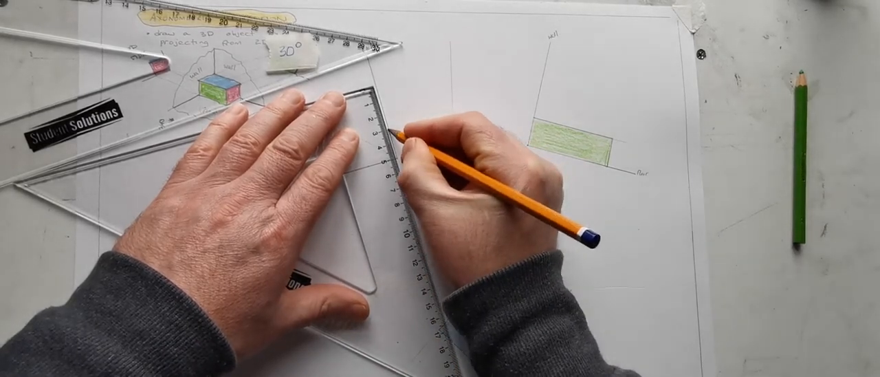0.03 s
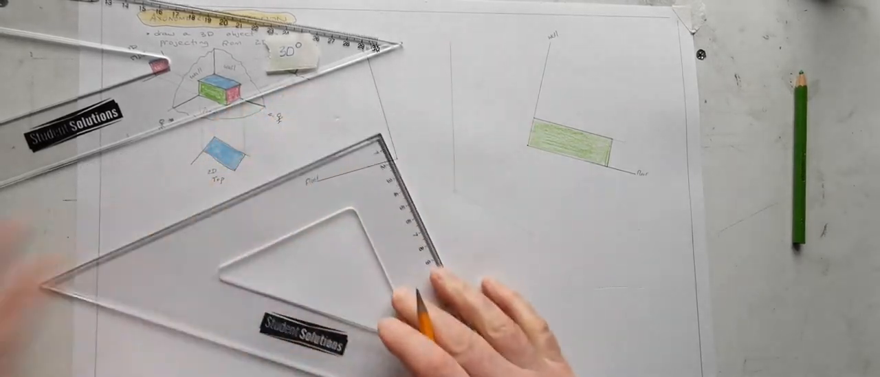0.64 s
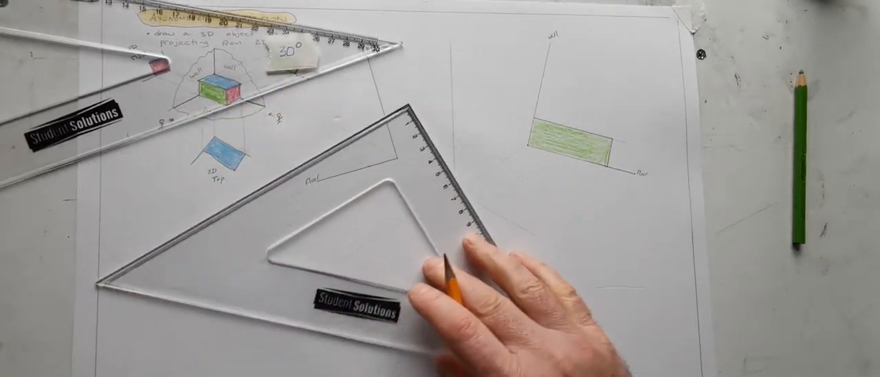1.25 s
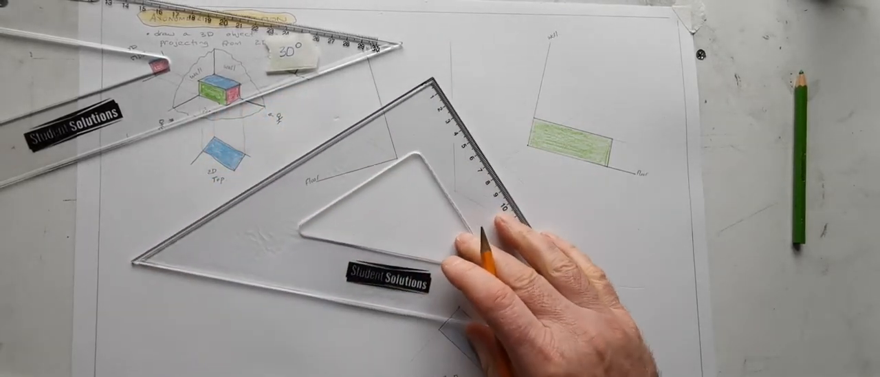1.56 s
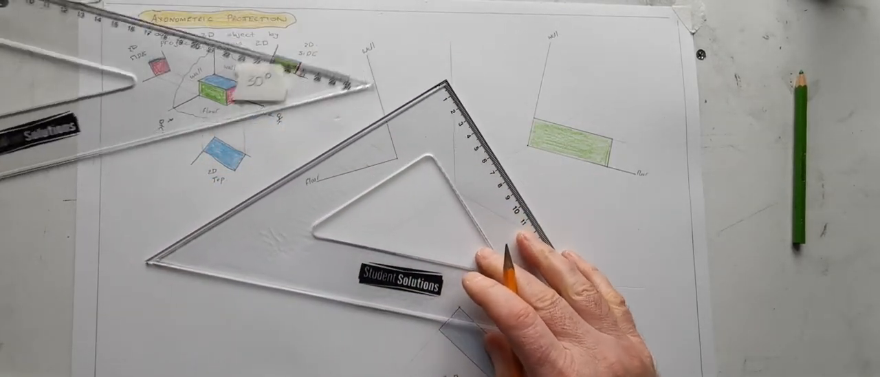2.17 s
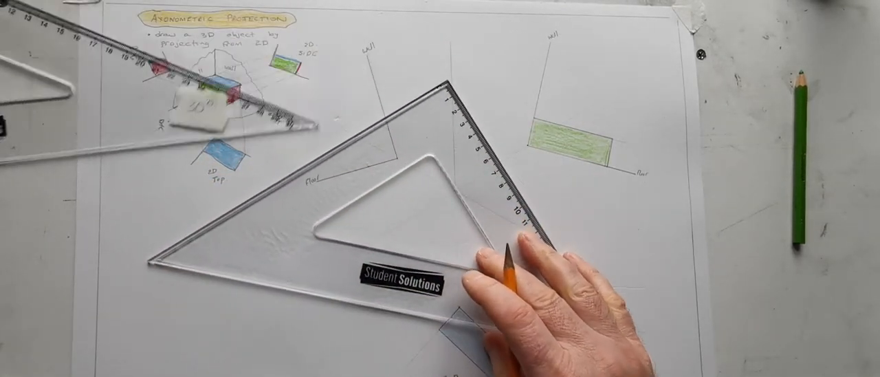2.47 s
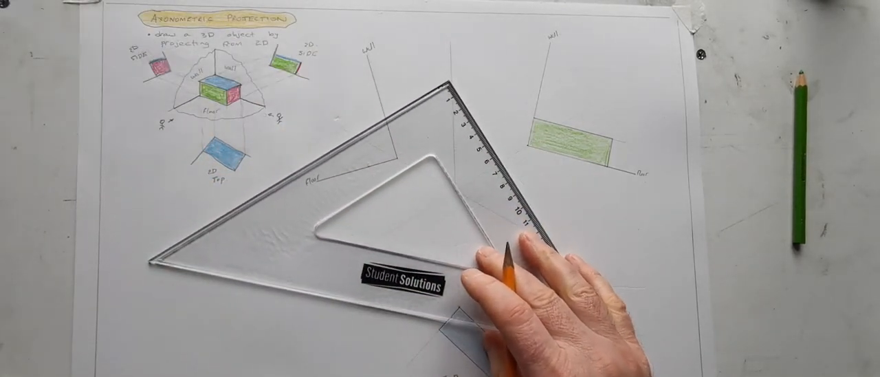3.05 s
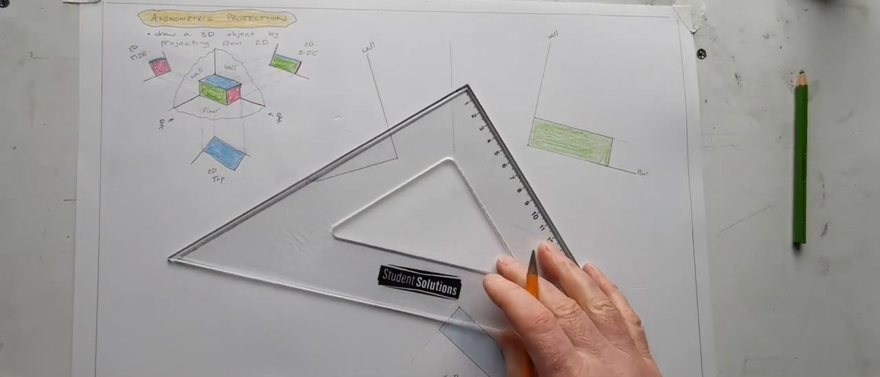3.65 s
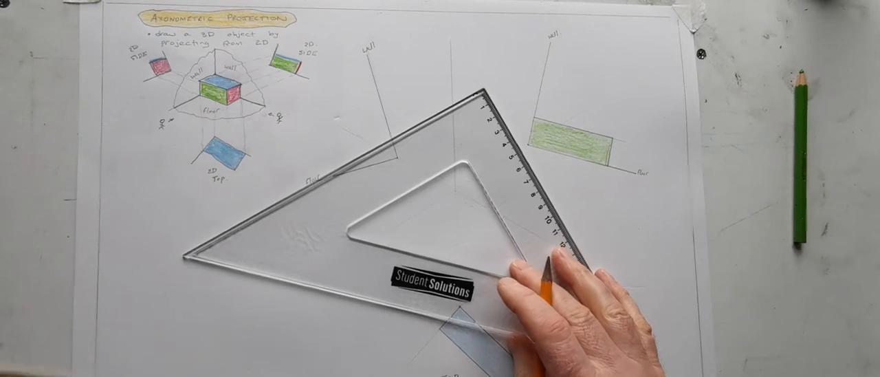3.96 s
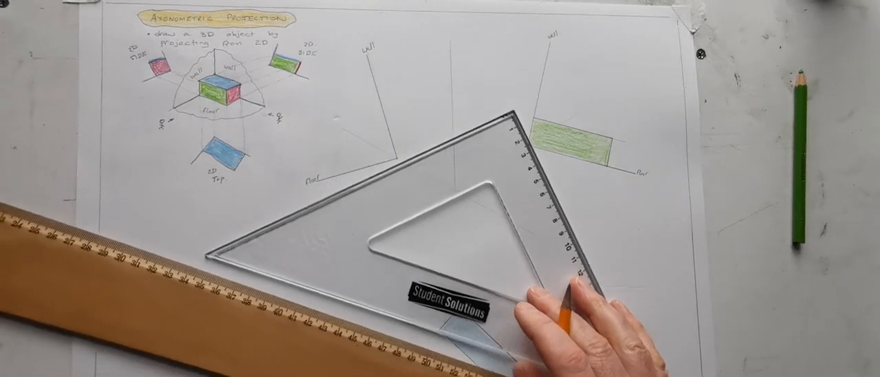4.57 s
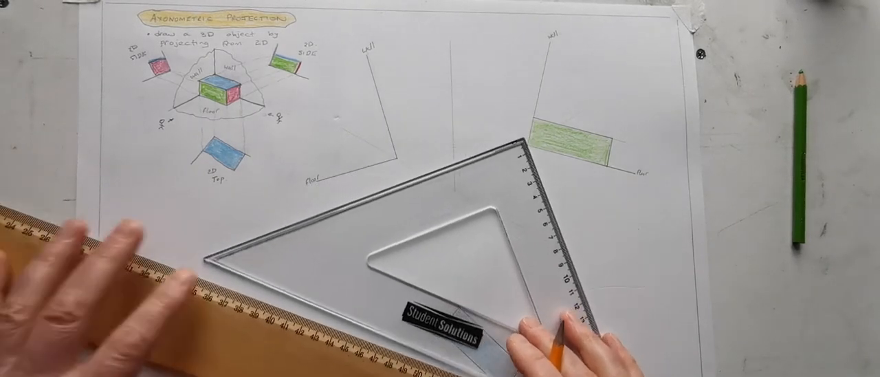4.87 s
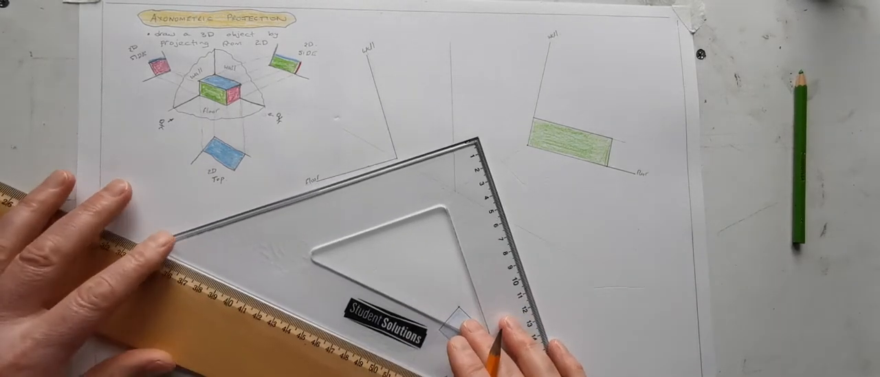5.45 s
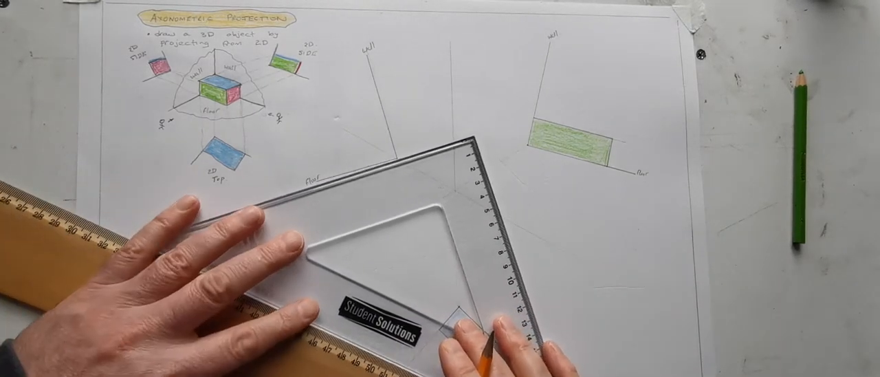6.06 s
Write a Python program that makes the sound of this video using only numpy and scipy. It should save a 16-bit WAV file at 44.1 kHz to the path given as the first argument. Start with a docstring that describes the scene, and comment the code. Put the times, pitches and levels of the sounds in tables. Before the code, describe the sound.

Hands brush paper in a small room as plastic drawing tools glide, tap and scrape, followed by a sliding wooden ruler.

```python
"""A small, bare room, at a paper-covered drawing board; a stereo pair stands far enough off that
reflections outweigh the direct sound. Hands brush the sheet and the board thuds and rumbles under them.
A large plastic set square slides and clacks down; a small one is swept off the paper, tapped down and
shoved aside. A wooden ruler is pushed in and knocks against the large square. Friction and sharp
contacts set each tool ringing at its own resonances."""
import sys
import numpy as np
from scipy import signal
from scipy.fft import rfft, irfft, next_fast_len
from scipy.io import wavfile
from scipy.ndimage import map_coordinates

SR = 44100
rng = np.random.default_rng(int(sys.argv[2]) if len(sys.argv) > 2 else 0)


def wav_record(signal):
    """Record a signal, one row per channel, as 16-bit PCM in the file named by sys.argv[1]."""
    frames = np.transpose(np.atleast_2d(signal))
    bounded = np.clip(frames, -1, 1)
    # unit amplitude maps onto the largest positive 16-bit level
    quanta = np.round(bounded * 32767).astype(np.int16)
    wavfile.write(sys.argv[1], SR, quanta)


N = 278271
TIME = np.arange(N) / SR

# Strokes on the paper. Each row: start, time speeding up and time slowing down in seconds,
# relative level in dB.
HAND_BRUSHES = [(0.16, .12, 0.38, -63.5), (0.33, 0.14, 0.18, -59.5), (0.56, .15, 0.15, -63.5),
                (2.38, 0.074, 0.094, -70), (2.49, 0.08, 0.043, -57.5), (2.8, 0.075, .28, -70),
                (4.64, .12, 0.4, -68.5), (4.89, 0.16, 0.27, -53.5), (5.14, 0.19, 0.3, -62),
                (5.6, 0.052, 0.083, -73.5), (5.8, 0.24, 0.14, -69.5), (6.13, 0.068, 0.12, -70.5)]  # hands, sleeves and tools brushing lightly
LARGE_GLIDES = [(0.96, 0.017, 0.075, -63), (0.99, 0.43, 0.25, -47)]  # the large set square, nudged and then gliding
SMALL_SKIMS = [(1.99, .012, 0.11, -71.5), (2.07, .11, .24, -57.5), (2.25, 0.072, .05, -60)]  # the small set square, drawn lightly off the drawing
SMALL_CATCH = [(2.58, 0.064, 0.036, -54)]  # its edge gives a brief, low groan as it catches the sheet
SMALL_SWEEP = [(2.595, 0.13, 0.13, -36)]  # it is swept over the edge of the sheet
SMALL_SHOVES = [(3.43, .16, .04, -51), (3.595, .021, 0.13, -25.5), (3.68, 0.016, .05, -28.5),
                (3.66, 0.094, .18, -25.5)]  # it is shoved aside in jerks
SMALL_SQUEAK = [(3.51, .065, .02, -58)]  # its edge starts to slip
# The ruler pushed across the board. Each row: start, time speeding up and time slowing down in seconds,
# relative levels of the hiss and of the wood's groan in dB.
RULER_PUSHES = [(4.002, 0.0092, .04, -70, -50), (4.02, 0.024, .12, -49, -43), (4.08, 0.13, 0.44, -51, -56),
                (4.44, 0.086, .13, -53, -51), (4.585, 0.018, 0.094, -50.5, -53.5),
                (4.91, 0.0081, 0.058, -61.5, -41.5), (4.93, 0.14, .04, -55, -73)]

# Soft blows on the board. Each row: start in seconds, relative peak in dB, pitch the contact favours
# in Hz, left over right in dB.
BOARD_THUDS = [(0.62, -54, 135, 5), (0.965, -37.5, 154, 6), (1.021, -25, 144, 6), (1.122, -35.5, 123, 7),
               (1.211, -46.5, 233, 5), (1.593, -29.5, 284, 4), (1.624, -30.5, 140.6, 6),
               (1.671, -39.5, 62, 0), (1.745, -45.5, 230, 1.5), (2.059, -45, 131, 4.5),
               (2.351, -45.5, 121.5, 6), (2.475, -46.5, 233, 3), (2.78, -53, 148, 3), (3.43, -49.5, 180, 0),
               (3.614, -34.5, 181, -1.5), (3.62, -39, 62, -2), (3.695, -40, 225, 0), (4.037, -33.5, 62, -6),
               (4.085, -45, 110, -6), (4.17, -44, 60, -6), (4.477, -40, 222, 0), (4.637, -40.5, 308, 2),
               (5.054, -45.5, 135, 2)]
# Tools landing. Each row: start in seconds, relative level in dB, brightness in dB per octave,
# left over right in dB, seconds for the chatter to fall 60 dB.
SQUARE_CLACKS = [(0.959, -53, 11.5, 0, .08), (1.024, -42.5, -7.5, -2.5, 0.088),
                 (1.5893, -20, 0.46, -0.5, 0.0081), (1.5915, -22, -0.9, -2, 0.012),
                 (1.999, -64.5, -1.5, -3, .04), (2.343, -38.5, 2, 2, 0.059), (2.352, -43, -1.5, -9, 0.061)]
SMALL_TAPS = [(3.3174, -29, 0.35, -3, 0.071), (3.4072, -35, -0.7, -1.5, 0.058),
              (3.4504, -42.5, -1, -4, 0.11), (3.5753, -27.5, -0.8, -0.5, 0.13), (3.609, -26, 4.5, -3, 0.03),
              (3.6127, -18, 0.4, -4.5, 0.01), (3.6175, -21.5, 2, -3, 0.036),
              (3.690, -21.5, 1.5, -4.5, 0.057), (3.698, -26.5, -0.2, -7, 0.028)]
RULER_KNOCKS = [(2.477, -45.5, -6, -1, 0.045), (4.637, -49, -9.5, 12, 0.055),
                (5.0495, -29.5, -0.3, -1.5, 0.017), (5.060, -35, 0, 1.5, 0.033),
                (5.074, -39.5, -6, -3.5, 0.028)]

# The board's modes. Each row: frequency in Hz, relative level in dB, seconds to fall 60 dB.
BOARD_MODES = [(59, -4, 0.21), (103.5, 3, 0.3), (136.4, 5, 0.28), (165.9, -3.5, 0.22), (221.1, -0.5, 0.42),
               (294, -6, 0.25)]
# The tools' resonances. Each row: frequency in Hz, width in Hz, relative level in dB.
LARGE_MODES = [(670, 58, -0.5), (2206, 180, -7), (3100, 350, -0.5), (3430, 140, -0.5), (4530, 180, -6),
               (4700, 150, -6), (6640, 200, -1.5)]
SMALL_FREE_MODES = [(786, 50, -6.5), (1007, 60, -2), (1600, 70, -7.5), (1950, 80, -3.5), (2380, 130, 0.5),
                    (2740, 70, -3), (3280, 72, -1.5), (4700, 200, -3), (5430, 140, -1.5), (6640, 120, -5.5),
                    (7000, 80, -2.5), (9200, 280, -6.5), (9800, 200, -5.5), (11000, 880, -5.5)]  # the small square lying free
SMALL_PRESSED_MODES = [(590, 33, -1), (2030, 90, -3), (2450, 120, -6.5), (2460, 90, -1), (2870, 94, -1.5),
                       (4130, 64, -3), (4800, 260, -9.5), (5360, 260, -2), (6720, 200, -1),
                       (8400, 120, -5.5), (8900, 160, -4), (10600, 400, -5.5)]  # the same square pressed down
RULER_MODES = [(304, 29, 7), (556, 34, 6.5), (823, 53, 4.5), (1055, 56, 4.5), (1190, 24, 8.5),
               (1920, 70, 5.5), (1880, 100, -3), (2525, 130, 3.5)]

# Broad colour of the still room and of each contact. Each row: frequency in Hz, relative level in dB.
AIR_COLOUR = [(20, -18), (50, -7), (62, -17.5), (80, -18.5), (101, -1), (130, -13.5), (180, -15.5),
              (240, -17), (305, -8.5), (400, -27), (530, -18.5), (900, -23), (7700, -39.5), (16000, -35.5)]
BRUSH_COLOUR = [(180, -27.5), (300, 0.5), (366, -25), (462, -5), (634, -13), (978, -16), (1210, -17),
                (2250, -8), (3580, -12), (9240, -13), (16000, -18.5)]
RUMBLE_COLOUR = [(25, -5.5), (58, 8), (80, -7), (103, 8), (135, 1.5), (175, -2.5), (230, -0.5), (290, -1),
                 (380, -15.5), (600, -13), (900, -42)]
GLIDE_COLOUR = [(150, -30.5), (250, -1), (566, -17.5), (686, -2.5), (775, -15), (1060, -7.5), (1350, -16.5),
                (2200, -5), (3120, -7), (7980, -16), (9330, -14.5), (16000, -23)]
CLACK_COLOUR = [(90, -32), (150, -9), (280, -0.5), (400, -8.5), (560, -9), (1100, -11.5), (1500, -11),
                (2000, -6.5), (3200, -6.5), (5000, -10), (7000, -14.5), (11000, -21), (16000, -40)]
SKIM_COLOUR = [(350, -54), (600, -12), (634, -10), (1190, -18), (1930, -5), (2870, -7.5), (5790, -2),
               (11200, -3.5), (16000, -9)]
CATCH_COLOUR = [(180, -69), (300, -38), (533, -10), (828, -15.5), (895, -21), (1120, -2), (1600, -32),
                (2080, -54.5), (3520, -120)]
SWEEP_COLOUR = [(180, -43), (300, -21), (667, -17), (856, -20.5), (1230, -15.5), (1360, -15.5), (2320, -7),
                (2880, -8.5), (5340, -5.5), (9880, -6.5), (16000, -8)]
TAP_COLOUR = [(80, -34), (150, -7), (400, -8), (700, -9.5), (1040, -12.5), (1420, -11.5), (2310, -3),
              (2980, -10.5), (4600, -6.5), (9000, -8), (16000, -11)]
SHOVE_COLOUR = [(88, -32.5), (150, -6.5), (240, -7), (422, -14.5), (589, -4), (689, -5), (1240, -11),
                (2400, -1.5), (3920, -8.5), (4320, -1.5), (7770, -8.5), (11500, -9.5), (16000, -18.5)]
KNOCK_COLOUR = [(80, -44), (150, -15.5), (315, -11.5), (560, -9), (850, -9.5), (1400, -4), (2400, -7),
                (3200, -10), (5500, -14), (10600, -21), (16000, -32)]
PUSH_COLOUR = [(410, -32), (700, -5.5), (1230, -8.5), (1310, -5), (1480, -8), (3030, -1.5), (3840, -7.5),
               (4990, -5.5), (10800, -14), (16000, -22)]
GROAN_COLOUR = [(80, -21), (140, -1.5), (222, -0.5), (300, -6), (360, -2.5), (470, -5), (590, -2),
                (800, -15.5), (1200, -18.5), (2400, -47)]

# How alike the room sounds at the two microphones. Each row: frequency in Hz, correlation from -1 to 1.
MIC_LIKENESS = [(30, .35), (60, 0.64), (130, 0.68), (300, 0.77), (650, 0.22), (1300, -0.2), (3000, -0.04),
                (15000, -0.062)]
# The side the room favours. Each row: frequency in Hz, left over right in dB.
ROOM_LEAN = [(50, 3.5), (130, 5), (300, 2), (650, -2.5), (1400, -1.5), (4000, 0.7), (15000, 0.47)]
# The tail off the walls. Each row: frequency in Hz, seconds to fall 60 dB.
ROOM_DECAY = [(100, 0.42), (300, .38), (1000, 0.41), (3000, 0.32), (8000, 0.26), (15000, 0.33)]


def amp(db):
    """Decibels to gain."""
    return 10 ** (np.asarray(db) / 20)


def unit(x):
    """Scaled to rms 1."""
    return x / np.sqrt(np.mean(x ** 2) + 1e-20)


def along(points, hz):
    """(Hz, value) points read on a log frequency axis."""
    point_hz, values = np.transpose(points)
    return np.interp(np.log(hz + 1), np.log(point_hz + 1), values)


def wobble(rate):
    """A smooth random curve, rate knots a second."""
    return map_coordinates(rng.standard_normal(int(N * rate / SR) + 4), [TIME * rate])


def filtered(x, response):
    """x shaped by a gain that depends on frequency."""
    n = x.shape[-1]
    padded = next_fast_len(n + SR // 4)
    return irfft(rfft(x, padded) * response(np.fft.rfftfreq(padded, 1 / SR)), padded)[..., :n]


def panned(pair, pan_db):
    """Favours the left microphone over the right by pan_db."""
    return pair * amp([[pan_db / 2], [-pan_db / 2]])


def add(track, start_s, sound):
    """Mixes a sound in at start_s."""
    part = track[:, max(round(start_s * SR), 0):][:, :sound.shape[-1]]
    part += sound[..., :part.shape[1]]


def diffuse(size):
    """Noise reaching the microphones from all around: alike in the bass, unrelated in the treble."""
    def mid_side_gains(hz):
        angle = np.arccos(np.clip(along(MIC_LIKENESS, hz), -1, 1)) / 2
        return np.array([np.cos(angle), np.sin(angle)])

    mid, side = filtered(rng.standard_normal((2, size)), mid_side_gains)
    pair = np.array([mid + side, mid - side])
    return filtered(pair, lambda hz: amp(np.outer([.5, -.5], along(ROOM_LEAN, hz))))


def room(direct_db, pan_db, early_db=1, early_t60=0.039):
    """Path from board to microphones: direct sound, desk reflections and the walls' tail."""
    hz, t, spectra = signal.stft(diffuse(SR * 2 // 3), SR, nperseg=256)
    t60 = along(ROOM_DECAY, hz)[:, None]
    fade = amp(-60 * t / t60) + amp(early_db - 60 * t / early_t60)
    path = signal.istft(spectra * fade / np.linalg.norm(fade, axis=1, keepdims=True), SR, nperseg=256)[1]
    path /= np.linalg.norm(path[0])
    path[0, 10] += amp(direct_db)  # the sound reaches the right microphone first
    path[1, 0] += amp(direct_db)
    return panned(path / np.linalg.norm(path[0]), pan_db)


def body(colour, modes=(), ring_db=0, tilt_db=0, size=8192):
    """An object's impulse response, energy 1: a broad colour with resonances standing out of it."""
    hz = np.fft.rfftfreq(size, 1 / SR)
    peaks = sum(amp(db + ring_db) ** 2 / (1 + (2 * (hz - f) / width) ** 2) for f, width, db in modes)
    gain = amp(along(colour, hz) + tilt_db * np.log2(np.maximum(hz, 400))) * np.sqrt(1 + peaks)
    # minimum phase: nothing rings before the contact
    cepstrum = irfft(np.log(np.maximum(gain / gain.max(), 1e-6)))
    cepstrum[1:size // 2] *= 2
    cepstrum[size // 2 + 1:] = 0
    response = irfft(np.exp(rfft(cepstrum)))
    return response / np.linalg.norm(response)


def still_air():
    """Faint room tone, all around the microphones."""
    return amp(-68.5) * unit(filtered(diffuse(N), lambda hz: amp(along(AIR_COLOUR, hz))))


def stroke(rows, steep=1.9, level_column=0):
    """Gain per sample: each stroke speeds up and slows to rest; friction grows as speed ** steep."""
    power = np.zeros(N)
    for start, rise_s, fall_s, *levels_db in rows:
        t = TIME - start
        ramp = np.clip(np.minimum(t / rise_s, 1 - (t - rise_s) / fall_s), 0, 1)
        speed = np.sin(np.pi / 2 * ramp)
        power += (amp(levels_db[level_column]) * speed ** steep) ** 2
    return np.sqrt(power)


def rub(level, response, pan_db, grain_db, judder_db,
        drift_hz=5, brighten=.2, edge_hz=7000, catches_per_s=900, path_count=3):
    """Friction: a hiss of paper fibres and sparse larger catches, under an unsteady hand, shake a body."""
    grains = (rng.random(N) < catches_per_s / SR) * rng.standard_normal(N)
    force = unit(rng.standard_normal(N) + amp(grain_db) * unit(grains))
    force *= unit(amp(judder_db * wobble(70)))
    dull = filtered(force, lambda hz: 1 / (1 + (hz / edge_hz) ** 4))
    force = dull + (force - dull) * (level / level.max()) ** brighten  # a slower stroke is duller
    sound = signal.fftconvolve(level * force, response)[:N]
    # as the contact travels, its reflections change: the sound drifts between several paths
    shares = np.array([wobble(drift_hz) for _ in range(path_count)])
    shares /= np.linalg.norm(shares, axis=0)
    heard = np.zeros((2, N))
    for share in shares:
        path = room(direct_db=-13.5, pan_db=pan_db, early_db=6.5, early_t60=0.093)
        heard += signal.fftconvolve((share * sound)[None], path, axes=1)[:, :N]
    return heard


def hands():
    """Skin, cloth and lightly nudged plastic brush the sheet with a soft, even hiss."""
    return amp(3.5) * rub(stroke(HAND_BRUSHES, steep=1.4), body(BRUSH_COLOUR),
                          pan_db=-1.4, grain_db=-2, judder_db=2, drift_hz=14, brighten=.02, path_count=4)


def rumble(contacts, low_hz=200, high_hz=1500, linger_s=.08, rumble_db=-58.5, shake_db=-51):
    """Whatever slides or lands on the board shakes it into a low rumble that lingers a moment."""
    shake = filtered(contacts.mean(axis=0),
                     lambda hz: 1 / (1 + (hz / high_hz) ** 4) - 1 / (1 + (hz / low_hz) ** 4))
    hold = np.exp(-1 / (linger_s * SR))
    shake_rms = np.sqrt(signal.lfilter([1 - hold], [1, -hold], shake ** 2))
    level = amp(rumble_db) * (shake_rms / amp(shake_db)) ** 0.5  # half a dB for each dB of shaking
    noise = unit(filtered(diffuse(N), lambda hz: amp(along(RUMBLE_COLOUR, hz))))
    return level * panned(noise, pan_db=-2.5)


def board(swell_s=0.0063, reach_octaves=0.33):
    """Each soft blow swells the board's modes near its own pitch into a thud."""
    thuds, t = np.zeros((2, N)), np.arange(SR * 2 // 3) / SR
    for start, db, blow_hz, pan_db in BOARD_THUDS:
        ring = 0
        for hz, mode_db, t60 in BOARD_MODES:
            share = 1 / (1 + (np.log2(hz / blow_hz) / reach_octaves) ** 2)
            pitch_hz = hz * (1 + rng.normal(0, 0.016))  # the hands load the board differently each time
            ring += share * amp(mode_db - 60 * t / t60) * np.sin(2 * np.pi * pitch_hz * t)
        ring *= 1 - np.exp(-(t / swell_s) ** 2)
        add(thuds, start, amp(db) * panned(ring / np.abs(ring).max(), pan_db))
    return amp(-3.5) * thuds


def strikes(rows, colour, modes, ring_db, chatter_db, direct_db):
    """A flat tool lands: one sharp contact, then its face chatters briefly against the surface."""
    track, t = np.zeros((2, N)), np.arange(SR // 6) / SR
    for start, db, tilt_db, pan_db, chatter_t60 in rows:
        chatter = rng.standard_normal(len(t)) * amp(-60 * t / chatter_t60)
        force = amp(chatter_db) * chatter / np.linalg.norm(chatter)
        force[0] += 1  # the sharp contact
        ring = signal.fftconvolve(force, body(colour, modes, ring_db, tilt_db))
        heard = signal.fftconvolve(ring[None], room(direct_db, pan_db=0), axes=1)
        add(track, start, amp(db) * panned(heard / np.linalg.norm(heard), pan_db))
    return track


def large_square():
    """The large set square glides over the paper near centre; the plastic drops flat with a clack."""
    glide = rub(stroke(LARGE_GLIDES, steep=1.65), body(GLIDE_COLOUR, LARGE_MODES, ring_db=-8),
                pan_db=0.44, grain_db=-9, judder_db=-0.5, drift_hz=11, brighten=.1, path_count=4)
    clacks = strikes(SQUARE_CLACKS, CLACK_COLOUR, LARGE_MODES,
                     ring_db=1.5, chatter_db=-1.5, direct_db=-6.5)
    return amp(2) * glide + amp(26.5) * clacks


def small_square():
    """The small set square skims, catches, scrapes and rings, is tapped down, then shoved on the right."""
    skim = rub(stroke(SMALL_SKIMS, steep=1.16), body(SKIM_COLOUR),
               pan_db=-0.8, grain_db=-0.5, judder_db=2, drift_hz=10, brighten=.05)
    catch = rub(stroke(SMALL_CATCH), body(CATCH_COLOUR),
                pan_db=1, grain_db=1.5, judder_db=0, path_count=1)
    sweep = rub(stroke(SMALL_SWEEP, steep=2.16), body(SWEEP_COLOUR, SMALL_FREE_MODES, ring_db=6.5),
                pan_db=-0.8, grain_db=4.5, judder_db=2.5, drift_hz=8, brighten=.05)
    shove = rub(stroke(SMALL_SHOVES, steep=2.96), body(SHOVE_COLOUR, SMALL_PRESSED_MODES, ring_db=3),
                pan_db=-6.5, grain_db=2, judder_db=4, drift_hz=11, brighten=.25, catches_per_s=390)
    taps = strikes(SMALL_TAPS, TAP_COLOUR, SMALL_FREE_MODES, ring_db=9, chatter_db=4, direct_db=-10.5)
    return amp(3.5) * skim + amp(-2) * catch + amp(3.5) * sweep + amp(0.5) * shove + amp(28.5) * taps


def ruler():
    """The wood hisses and groans over the board, right of centre, and knocks against the set square."""
    hiss = rub(stroke(RULER_PUSHES, steep=1.13), body(PUSH_COLOUR),
               pan_db=-6, grain_db=-4, judder_db=1.5, drift_hz=9, brighten=.1)
    groan = rub(stroke(RULER_PUSHES, steep=1.45, level_column=1), body(GROAN_COLOUR),
                pan_db=-4.5, grain_db=4, judder_db=1, drift_hz=14, path_count=4)
    knocks = strikes(RULER_KNOCKS, KNOCK_COLOUR, RULER_MODES, ring_db=6.5, chatter_db=0.5, direct_db=-4)
    return amp(3) * hiss + amp(1) * groan + amp(31) * knocks


def squeak(pitch_hz=4800, width_hz=90):
    """Uneven slips of the small square's edge faintly excite one narrow resonance of the plastic."""
    ring = filtered(diffuse(N), lambda hz: 1 / (1 + ((hz - pitch_hz) / width_hz) ** 2))
    return stroke(SMALL_SQUEAK) * panned(unit(ring), pan_db=-2)


def scene():
    """The drawing board and the room, as heard at the microphones."""
    contacts = hands() + large_square() + small_square() + squeak() + ruler() + board()
    return contacts + rumble(contacts) + still_air()


def record(dry, top_hz=16000):
    """The recorder keeps nothing above its band limit."""
    return filtered(dry, lambda hz: 1 / np.sqrt(1 + (hz / top_hz) ** 200))


dry = scene()
out = record(dry)
wav_record(out)
```